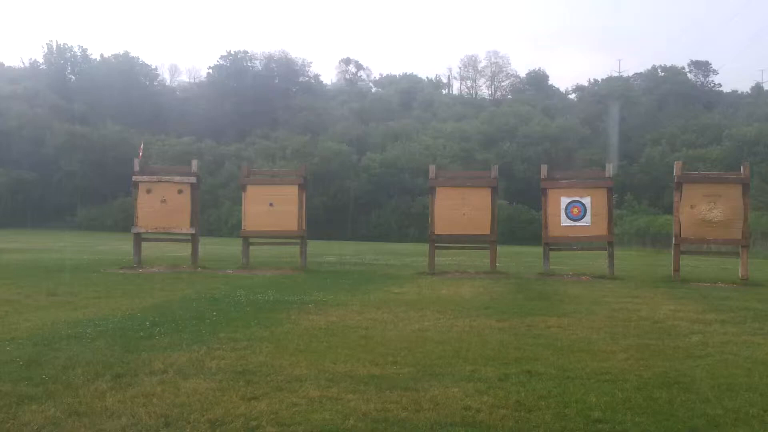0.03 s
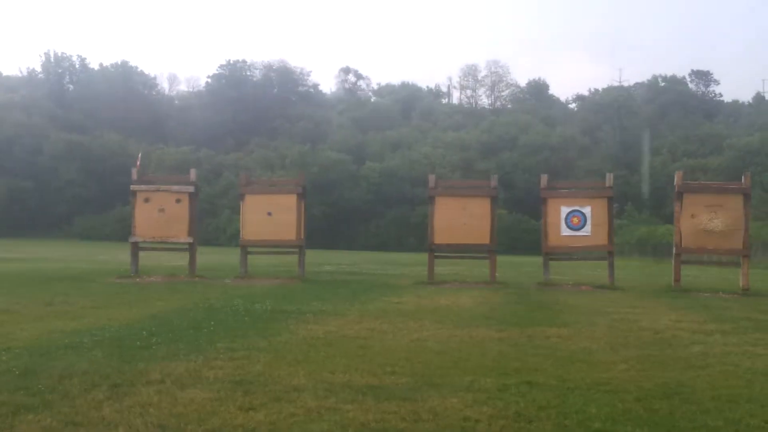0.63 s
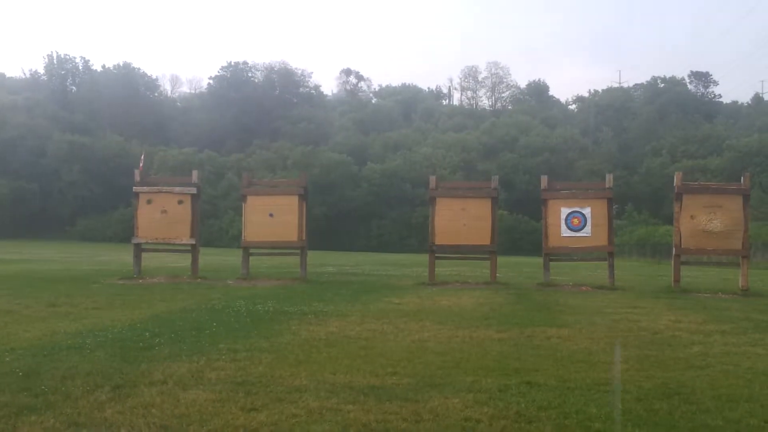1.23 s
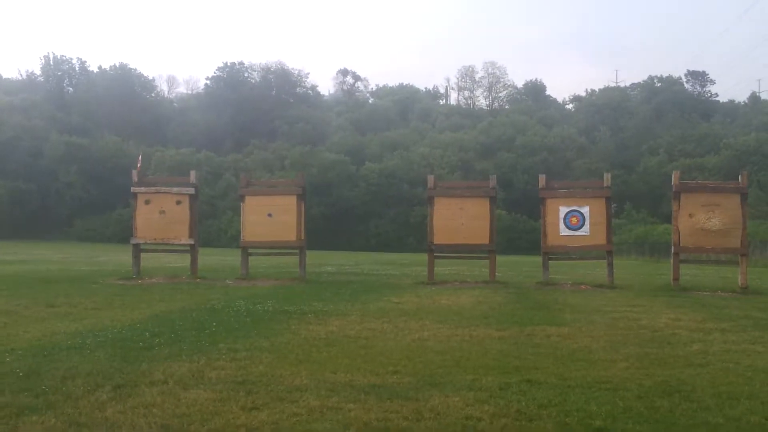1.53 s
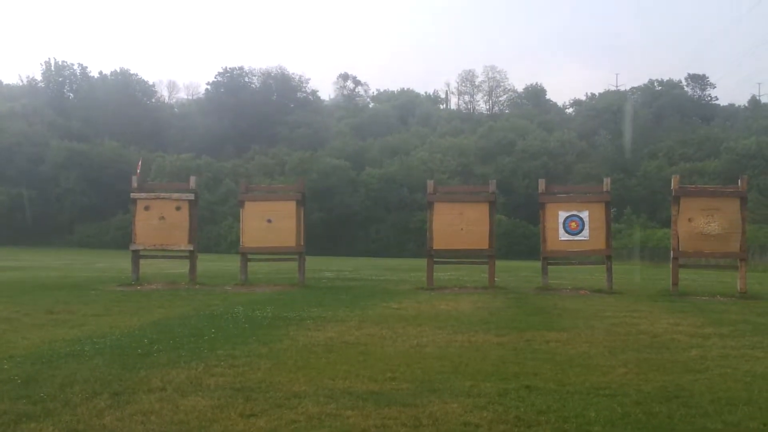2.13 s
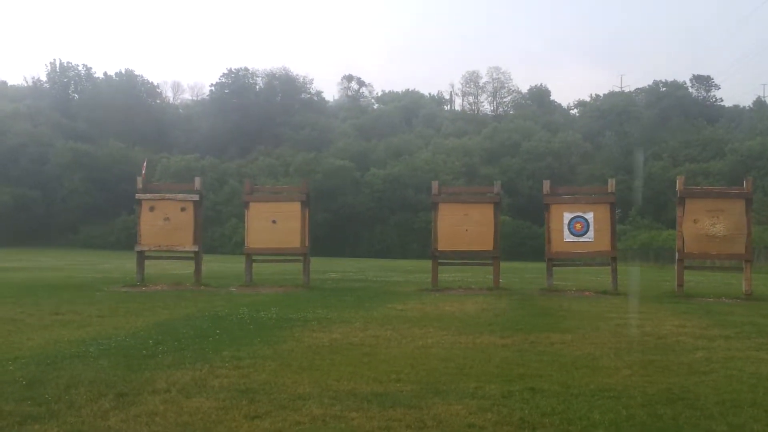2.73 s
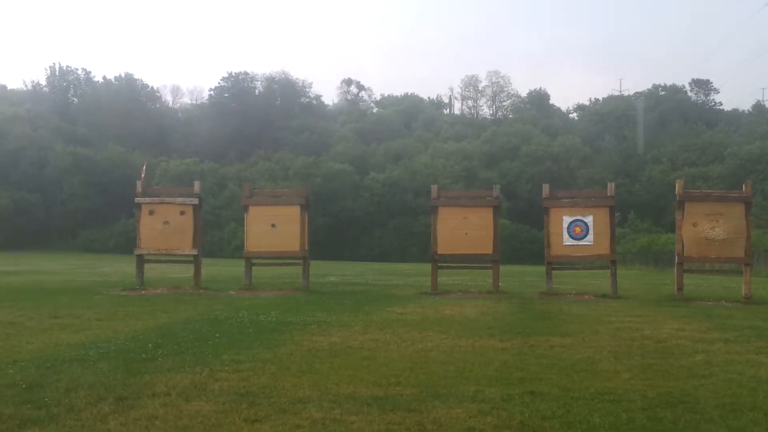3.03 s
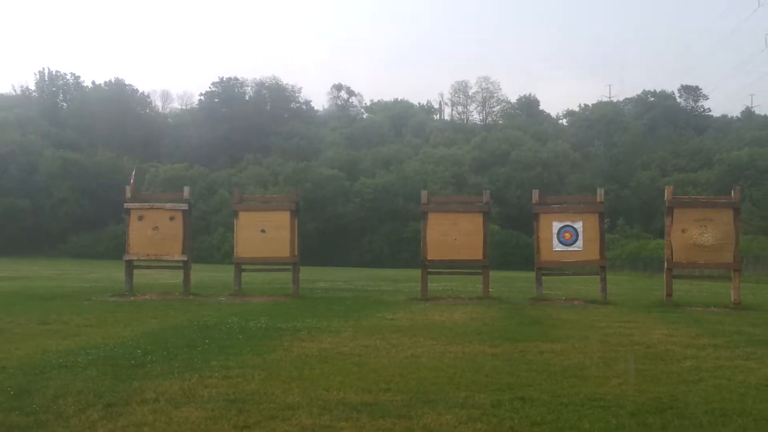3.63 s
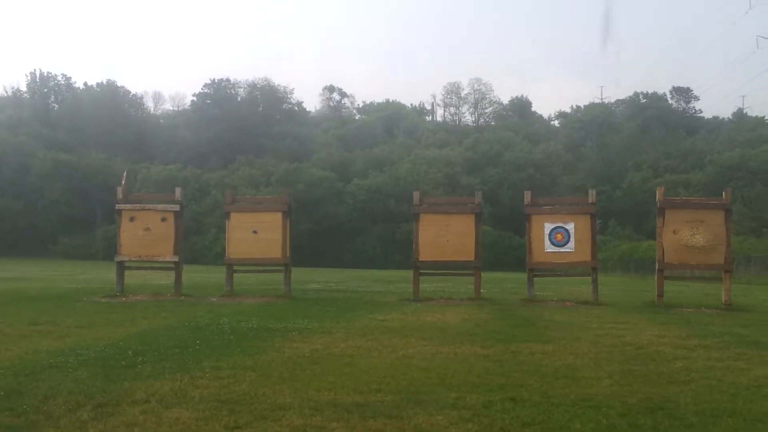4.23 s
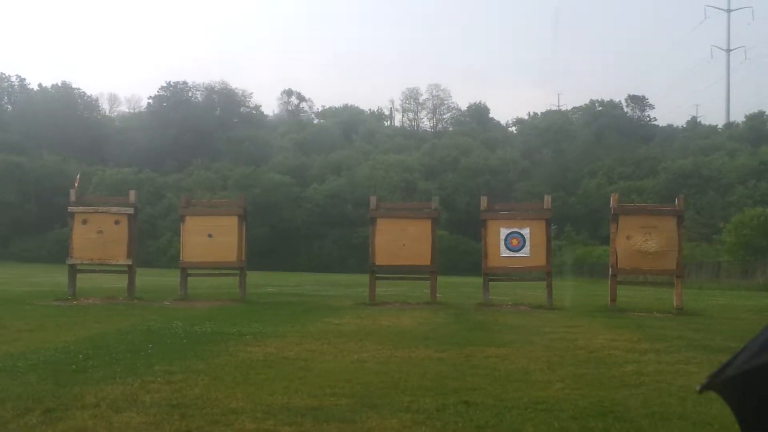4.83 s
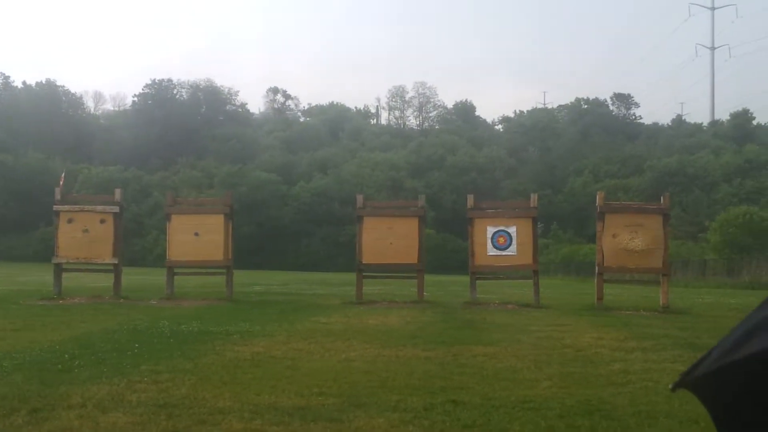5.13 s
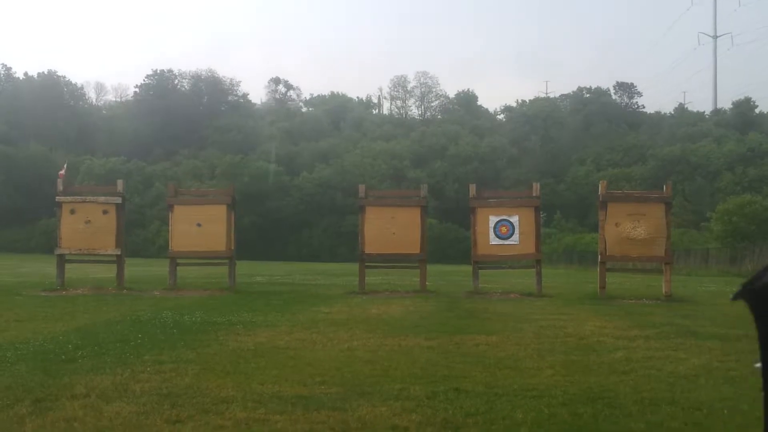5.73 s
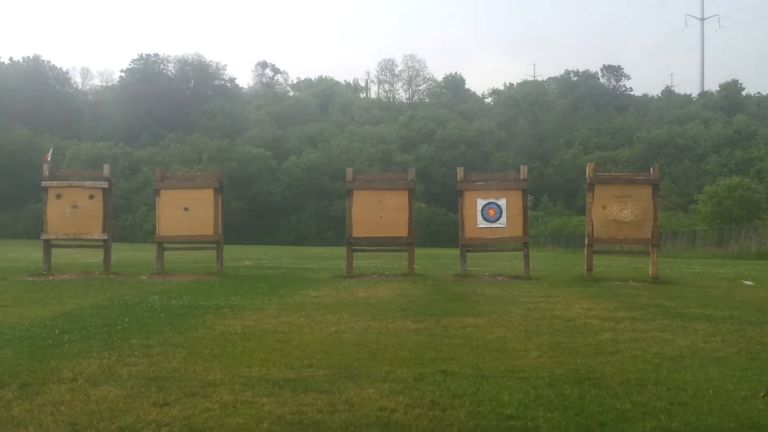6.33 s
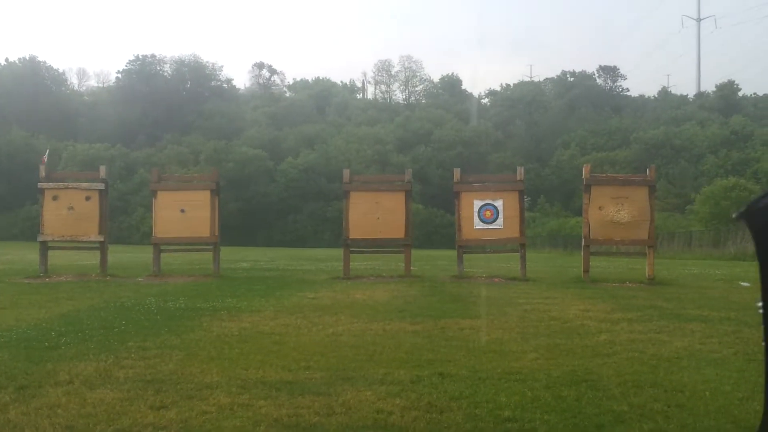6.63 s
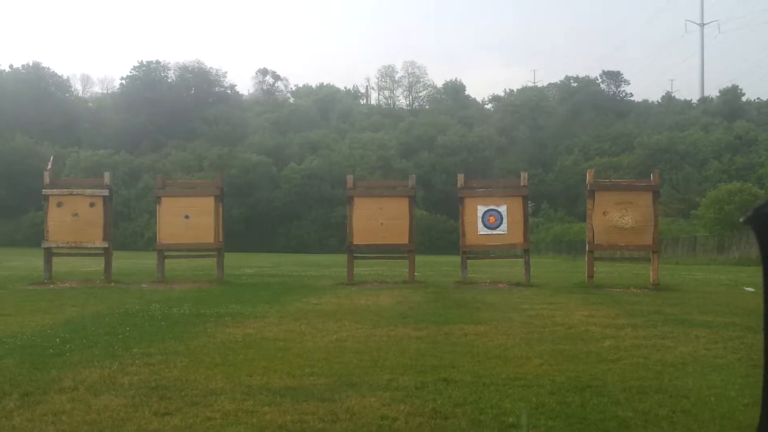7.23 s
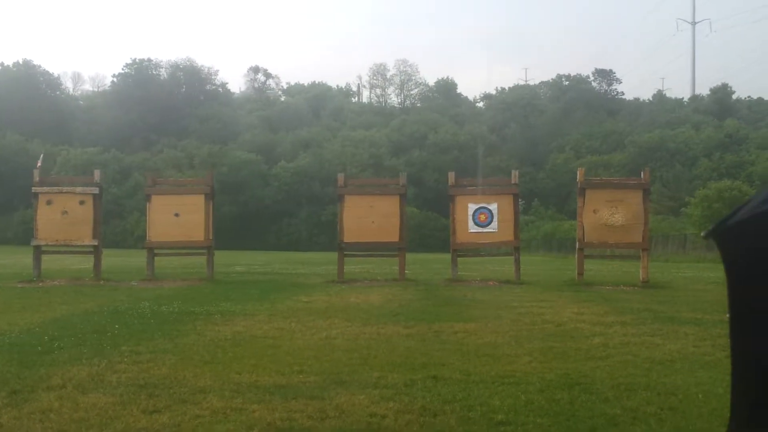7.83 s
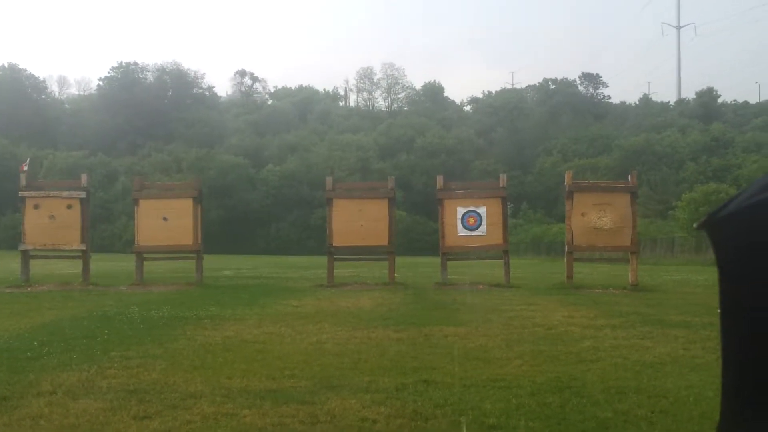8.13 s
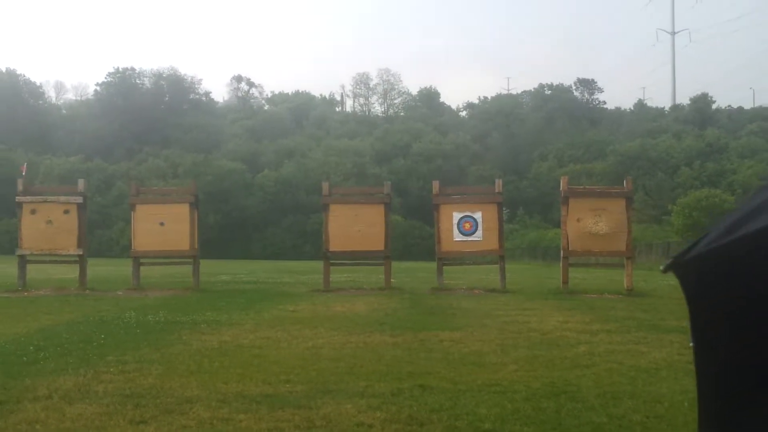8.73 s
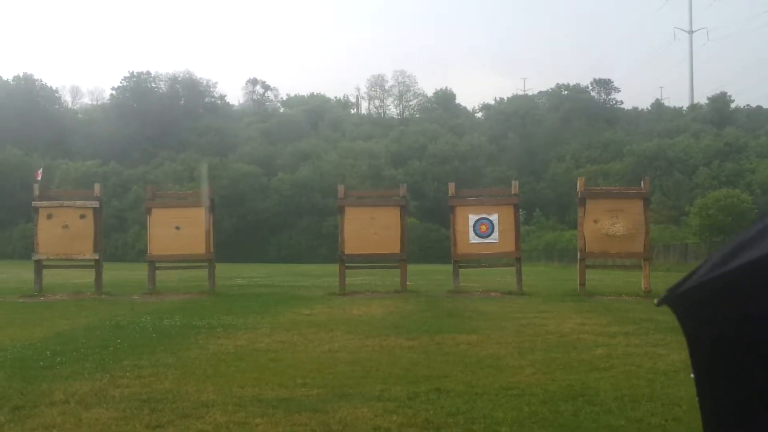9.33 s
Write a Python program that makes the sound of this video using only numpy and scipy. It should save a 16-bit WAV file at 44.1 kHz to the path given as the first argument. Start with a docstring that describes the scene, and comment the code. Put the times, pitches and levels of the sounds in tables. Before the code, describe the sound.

After a second of silence with one small click, heavy rain starts abruptly, drumming on an umbrella held just above the microphone at the edge of a grass field. Dense drops snap on the taut cloth, with occasional deeper thumps and bright pings. Rain hisses and spatters on the grass all around, over a faint rumble of air and the shifting umbrella. The patter continues to the end.

```python
"""At the edge of a grass field, heavy rain drums on an umbrella held just over a phone.
Each impact drives the taut cloth, a damped membrane that snaps back and rings briefly; heavy drops
thump whole panels and a few ping brightly. Rain hisses and spatters on the grass all round, the
umbrella rumbles as it shifts, and air stirs at the two microphone ports.
The first second is silent but for one small click."""
import sys
import numpy as np
from scipy import signal
from scipy.fft import rfft, irfft
from scipy.io import wavfile
from scipy.ndimage import uniform_filter1d

SR = 44100
rng = np.random.default_rng(int(sys.argv[2]) if len(sys.argv) > 2 else 0)


def int16_out(signal):
    """Quantize to a 16-bit WAV file."""
    q = np.round(np.clip(np.atleast_2d(signal).T, -1, 1) * 32767)
    wavfile.write(sys.argv[1], SR, q.astype(np.int16))


N = 413658
TIME, FREQS = np.arange(N) / SR, np.fft.rfftfreq(N, 1 / SR)
START_S = 1.004  # the rain is heard from here on

# Levels in the tables are relative, ahead of each source's gain and filtering.
# heaviest drops on the cloth: start_s, level_db, contact_ms, flutter_hz, flutter_ratio, left_lag_ms
HEAVY_DROPS = [(1.0269, -7, 0.16, 2000.0, 0.32, 0.058), (1.0942, -8, 0.18, 1500.0, 0.35, 0.28),
               (1.1113, -4, 1.2, 2600.0, 0.35, 0), (1.1155, 9, 1.3, 3820, 0.3, 0.082),
               (1.1506, 3.5, 0.39, 3800.0, 0.23, 0.12), (1.1924, 2.5, 0.94, 6000.0, 0.062, 0.18),
               (1.2512, -0.5, 0.25, 5230, 0.42, 0.067), (1.3091, 2, 0.45, 6800.0, 0.1, 0.076),
               (1.3213, 0.5, 0.13, 6800.0, 0.1, 0.13), (1.3418, 0.5, 0.29, 2000.0, 0.35, 0.12),
               (1.3628, -1, 0.23, 1500.0, 0.31, 0.12), (1.3716, 1, 0.77, 3800.0, 0.18, 0.14),
               (1.4832, 0, 0.44, 4480, 0.25, 0.24), (1.5658, 2, 0.28, 5200.0, 0.092, 0.036),
               (1.6094, 0, 0.79, 4500.0, 0.15, 0.13), (1.66, 1.5, 0.35, 4500.0, 0.091, 0.09),
               (1.677, -2, 0.4, 6000, 0.16, 0.17), (1.7245, -4, 0.44, 2600.0, 0.2, 0.14),
               (1.7582, -2, 0.11, 4500.0, 0.2, 0.18), (1.7776, 3, 1.1, 4500.0, 0.089, 0.17),
               (1.7826, -4, 0.38, 4500.0, 0.2, 0.1), (1.8256, 0, 0.3, 5200.0, 0.2, 0.096),
               (1.8388, -0.5, 0.18, 2000.0, 0.66, 0.34), (1.8458, 2, 0.19, 6800.0, 0.082, 0.14),
               (2.0037, 1, 0.64, 3800.0, 0.14, 0.15), (2.0658, -1, 0.44, 3200.0, 0.2, 0.13),
               (2.0763, -0.5, 0.23, 6800.0, 0.31, 0.0046), (2.081, 0.5, 1.3, 2000.0, 0.62, 0.15),
               (2.1184, -11, 0.35, 5200.0, 0.2, 0.22), (2.1376, -2, 0.36, 5200.0, 0.2, 0.22),
               (2.1653, -9, 0.6, 3800.0, 0.17, 0.12), (2.1916, 0, 0.25, 4500.0, 0.2, 0.13),
               (2.2005, -2.5, 0.36, 6000.0, 0.22, 0.24), (2.2147, 0.5, 0.38, 6000.0, 0.11, 0.0072),
               (2.2251, 0, 0.7, 2000.0, 0.2, 0.031), (2.2377, 4, 0.19, 5170, 0.084, 0.3),
               (2.4301, -4, 0.5, 3800.0, 0.25, 0.26), (2.5489, -5, 0.37, 3800, 0.15, 0.16),
               (2.6277, 0, 0.18, 6000.0, 0.1, 0.083), (2.6499, 0, 0.85, 6800.0, 0.1, 0.2),
               (2.6573, -3, 0.7, 3200.0, 0.22, 0.2), (2.7059, -1, 0.43, 6800.0, 0.2, 0.16),
               (2.8254, -1.5, 0.43, 5200.0, 0.3, 0.11), (2.8488, 2, 0.98, 1500.0, 0.1, 0.11),
               (2.9138, -3, 0.39, 6000.0, 0.18, 0.14), (2.9375, 1, 0.14, 4500.0, 0.2, 0.089),
               (2.9623, 2, 0.5, 3800.0, 0.18, 0.18), (2.9822, 3.5, 0.27, 5400, 0.44, 0.24),
               (3.0449, -4, 0.29, 2000, 0.2, 0.15), (3.1126, 8.5, 1.6, 3200.0, 0.12, 0.089),
               (3.151, 6, 0.48, 6000, 0.13, 0.14), (3.1715, -4, 0.84, 3200.0, 0.2, 0.32),
               (3.2514, -1, 1.3, 2600.0, 0.18, 0.2), (3.3022, 5.5, 0.28, 6760, 0.12, 0.24),
               (3.3356, 0, 0.38, 1500.0, 0.2, 0.37), (3.3785, -0.5, 0.13, 3840, 0.36, 0.038),
               (3.6032, 4, 1.2, 2600.0, 0.19, 0.18), (3.6149, -1.5, 0.38, 3800.0, 0.2, 0.055),
               (3.6392, 6, 0.89, 3200.0, 0.12, 0.094), (3.6642, -4, 0.65, 2000, 0.15, 0.15),
               (3.7018, -0.5, 0.48, 6800.0, 0.086, 0.046), (3.7768, 1.5, 1.3, 2000.0, 0.18, 0.22),
               (3.8907, -17, 0.2, 2600, 0.15, 0.12), (3.96, 3.5, 0.56, 5230, 0.15, 0.099),
               (3.9983, -0.5, 0.34, 3200.0, 0.2, 0.15), (4.0638, -1.5, 0.32, 2000, 0.25, 0.16),
               (4.1027, 1, 0.16, 3200.0, 0.32, 0.097), (4.1665, 0, 0.77, 6000.0, 0.076, 0.051),
               (4.1863, -1.5, 0.32, 4500.0, 0.29, 0.16), (4.2153, 2.5, 0.46, 2600.0, 0.092, 0.086),
               (4.2227, 2.5, 0.23, 2000.0, 0.2, 0.1), (4.2891, -6, 0.34, 3200.0, 0.22, 0.13),
               (4.2952, -3, 0.24, 3800, 0.18, 0.052), (4.3603, 2.5, 0.26, 2000.0, 0.2, 0.16),
               (4.3717, 2.5, 0.068, 5200.0, 0.1, 0.11), (4.4835, 4, 1.3, 3800.0, 0.092, 0.099),
               (4.6738, 5.5, 0.5, 6000.0, 0.14, 0.16), (4.6053, 0.5, 0.17, 2000, 0.2, 0.18),
               (4.8193, -3.5, 0.19, 3800.0, 0.2, 0.047), (4.8684, 0, 0.4, 1800, 0.18, 0.15),
               (5.0288, 0, 0.36, 5240, 0.11, 0.18), (5.2263, -4, 1.3, 2600.0, 0.64, 0.21),
               (5.2899, 1.5, 0.82, 4500.0, 0.2, 0.24), (5.3109, -8, 0.5, 2000, 0.15, 0.15),
               (5.5802, 4.5, 1.1, 3800.0, 0.1, 0.13), (5.5876, 0, 0.36, 4500.0, 0.1, 0.15),
               (5.633, 0.5, 0.54, 2600.0, 0.22, 0.19), (5.8352, 5.5, 0.38, 4940, 0.2, 0.17),
               (5.933, -2, 0.39, 6000, 0.12, 0.21), (6.027, -5.5, 0.33, 4500.0, 0.14, 0.095),
               (6.0991, -2.5, 0.32, 3800.0, 0.1, 0.099), (6.2135, -6, 0.14, 2600.0, 0.2, 0.12),
               (6.2479, -3, 0.12, 5200.0, 0.2, 0.055), (6.3673, -0.5, 0.95, 4500.0, 0.23, 0.15),
               (6.5584, -7, 0.19, 7600.0, 0.2, 0.16), (6.6002, -3, 0.46, 3220, 0.2, 0.026),
               (6.6224, -5, 0.16, 4500, 0.15, 0.22), (6.7758, 1.5, 1.5, 2600.0, 0.35, 0.14),
               (7.0473, -4, 0.26, 3200.0, 0.27, 0.18), (7.1538, -1, 0.32, 2000.0, 0.25, 0.16),
               (7.2033, -3, 0.39, 2600.0, 0.4, 0.18), (7.3155, -4, 0.45, 2600, 0.15, 0.18),
               (7.3721, 2.5, 0.79, 2600.0, 0.1, 0.19), (7.518, 0.5, 0.78, 4500.0, 0.1, 0.2),
               (7.521, -2, 0.88, 5200.0, 0.2, 0.2), (7.6437, 5.5, 0.27, 5200.0, 0.1, 0.077),
               (7.7666, -2.5, 0.19, 2000.0, 0.47, 0.19), (7.7799, -2, 0.4, 6000.0, 0.2, 0.22),
               (7.8077, 5, 0.32, 3200.0, 0.1, 0.12), (7.8413, -1.5, 0.17, 4500.0, 0.4, 0.058),
               (7.9194, 3, 0.35, 5300, 0.25, 0.19), (8.0596, -3.5, 0.25, 3800.0, 0.36, 0.067),
               (8.2081, -2, 0.34, 3200.0, 0.1, 0.055), (8.2228, -4, 0.38, 2600, 0.2, 0.15),
               (8.2577, -5, 0.55, 3200, 0.2, 0.17), (8.2639, 1.5, 0.36, 5200.0, 0.1, 0.079),
               (8.3406, -3, 0.18, 3200, 0.2, 0.13), (8.4956, -2.5, 0.18, 2300, 0.35, 0.21),
               (8.5361, -4, 0.13, 1800, 0.5, 0.13), (8.615, 0, 0.12, 6470, 0.31, 0.14),
               (8.6277, 4, 0.95, 2020, 0.46, 0.067), (8.6443, -6, 0.35, 3200, 0.22, 0.15),
               (8.6925, -1, 0.37, 2600.0, 0.1, 0.14), (8.7287, -7, 0.1, 2000, 0.45, 0.12),
               (8.7756, -2.5, 0.38, 4500, 0.13, 0.081), (8.8328, -3, 0.67, 2000.0, 0.2, 0.16),
               (8.8528, 2.5, 0.18, 1500.0, 0.35, 0.22), (8.9097, 1, 0.4, 3200.0, 0.1, 0.13),
               (8.9979, 1.5, 1.1, 2600.0, 0.32, 0.2), (9.1454, 2, 0.52, 5200.0, 0.12, 0.15),
               (9.1792, 6.5, 0.32, 1500.0, 0.12, 0.22), (9.2118, -5, 0.59, 3800.0, 0.64, 0.074),
               (9.2337, -1.5, 0.49, 3220, 0.2, 0.15), (9.3015, 3.5, 0.23, 6900, 0.12, 0.087)]
# pings of drops on hard or wet spots: start_s, level_db, pitch_hz
PINGS = [(1.2264, -20, 3500), (1.7024, -22, 6500), (1.7578, -16, 11500), (1.7611, -15, 6800),
         (2.0864, -16, 6900), (2.1377, -21, 5800), (2.2115, -14, 4020), (2.2797, -23, 6600),
         (2.6878, -6, 6460), (2.691, -4.5, 7440), (2.7184, -18, 6000), (2.892, -20, 4000),
         (2.936, -19, 11500), (3.2025, -17.5, 4000), (3.299, -16, 6270), (3.377, -19, 12000),
         (3.3918, -6, 8050), (3.395, -8, 7550), (3.5193, -21, 8800), (3.5592, -14.5, 6540),
         (3.6697, -15, 5600), (3.7245, -17, 6000), (3.9339, -21, 6000), (4.0194, -16, 12000),
         (4.1212, -16, 11000), (4.2, -18, 6000), (4.6735, -11, 6500), (5.0857, -14, 3700),
         (5.0962, -20, 11500), (5.1708, -18, 3800), (5.3083, -19, 10900), (5.8018, -24, 8400),
         (5.835, -8, 6200), (5.8713, -21, 5900), (6.1195, -17, 10000), (6.5582, -12, 7490),
         (6.755, -16, 5700), (7.1686, -21, 5900), (7.4743, -16, 12000), (7.906, -18, 6500),
         (8.2072, -20, 9550), (8.5455, -18, 6550), (8.615, -10, 6830), (8.6445, -17, 3270),
         (8.8466, -16, 6760), (8.85, -15, 6500), (8.865, -16, 3700), (8.9689, -20, 6000),
         (8.973, -12.5, 6000), (9.0644, -14, 11600), (9.0667, -15, 8600), (9.182, -13.5, 6400)]
# thumps of a whole panel: start_s, level_db, pitch_hz
PANEL_THUMPS = [(1.116, -17, 670), (1.793, -11, 246), (2.0037, -13, 290), (2.587, -18, 46),
                (2.812, -12.5, 79.5), (3.113, -3, 826), (3.151, -6, 360), (3.6388, -16, 580),
                (3.959, -13, 650), (4.106, -11, 198), (4.308, -14, 156), (4.6738, -18, 680),
                (4.674, -16, 215), (4.897, -17, 99), (5.5805, -7, 298), (5.8352, -2.5, 276),
                (5.8365, -14, 620), (7.512, -22, 75)]
# puffs of air on the left port: centre_s, level_db
AIR_PUFFS = [(1.309, -13.5), (1.373, -10), (1.491, -11.5)]
# strength of the shower and softness of its patter: time_s, level_db, contact_ms
SHOWER_COURSE = [(1.25, -28.5, 0.6), (1.77, -26.5, 0.63), (2.15, -26, 0.58), (2.31, -29, 0.34),
                 (2.51, -31.5, 0.39), (3.03, -27, 0.56), (3.48, -28, 0.51), (4.09, -27.5, 0.44),
                 (4.93, -31, 0.49), (5.4, -28.5, 0.66), (6.28, -30.5, 0.62), (7.75, -27.5, 0.97),
                 (8.04, -29.5, 0.55), (9.35, -28.5, 0.71)]
# octave bands in which the cloth rings: centre_hz, t60_s, level_db
RING_BANDS = [(89, 0.1, -33), (178, 0.09, -11.5), (387, 0.028, -14), (670, 0.11, -6.5), (1363, 0.033, -4.5),
              (3000, 0.065, -3.5), (6000, 0.04, -5)]
# radiation response of the cloth: frequency_hz, gain_db
CLOTH_RESPONSE = [(60, -9.5), (250, 0.5), (330, 0.1), (460, -2.3), (560, 0.2), (700, 0.5), (950, -0.73),
                  (1400, 0.2), (2300, -0.9), (3500, -1), (5500, 0), (9000, 1.5), (15000, -2)]
# spectrum of rain on the grass: frequency_hz, density_db
GRASS_SPECTRUM = [(100, -3), (600, -16.5), (1300, -6.5), (2500, -14), (5000, -15), (8000, -16.5),
                  (15000, -20.5)]
# spectrum of the canopy's boom: frequency_hz, density_db
BOOM_SPECTRUM = [(20, -17), (45, 0), (80, 1), (130, -2.5), (220, -3.5), (330, -2.5), (600, -23),
                 (3000, -59)]
# spectrum of air moving at the ports: frequency_hz, density_db
AIR_SPECTRUM = [(15, -10), (35, 10), (65, 7), (110, 7.5), (250, -38), (1500, -25)]
# left and right microphone port cavities: resonance_hz, width_hz, rolloff_hz
PORT_CAVITIES = [(6740, 2850, 9900), (7920, 4030, 48000)]
# envelope of the rumble as the umbrella shifts: time_s, level_db
HANDLING_ENVELOPE = [(2.45, -58), (2.59, -27), (2.7, -50), (2.82, -32), (2.95, -58), (7.68, -66),
                     (7.77, -31), (7.82, -42), (7.86, -24), (7.91, -46), (7.965, -28), (8.01, -28.5),
                     (8.1, -56)]
# spectrum of that rumble: frequency_hz, density_db
HANDLING_SPECTRUM = [(50, -9), (110, -6.5), (200, 0.5), (270, 3.5), (400, -33), (1500, -68)]


def undb(db):
    """Amplitude ratio of a level in decibels."""
    return 10 ** (np.asarray(db) / 20)


def unit(x):
    """Normalisation to rms 1."""
    return x / np.sqrt(np.mean(x ** 2))


def decay(t, t60_s):
    """Exponential damping: 60 dB down after t60_s."""
    return np.exp(-np.log(1000) * t / t60_s)


def add(out, start_s, sound):
    """Superposition: a sound adds to the mix from start_s."""
    i = int(np.clip(start_s * SR, 0, N - 1))
    out[..., i:i + sound.shape[-1]] += sound[..., :N - i]


def colour(x, points, size=2048):
    """Minimum-phase filtering through (frequency_hz, gain_db) points."""
    hz, db = np.transpose(points)
    log_hz = np.log(np.fft.rfftfreq(size, 1 / SR) + 1)
    log_gain = np.log(undb(np.interp(log_hz, np.log(hz), db)))
    cepstrum = irfft(log_gain)[:size // 2]
    cepstrum[1:] *= 2
    impulse_response = irfft(np.exp(rfft(cepstrum, size)))
    return signal.oaconvolve(np.atleast_2d(x), impulse_response[None], axes=1)[:, :N]


def noise(spectrum, shape=N):
    """Spectral shaping of white noise, at rms 1."""
    return unit(colour(rng.standard_normal(shape), spectrum))


def resonance(hz, width_hz):
    """Frequency response of a damped mass on a spring."""
    return 1 / (1 - (FREQS / hz) ** 2 + 1j * FREQS * width_hz / hz ** 2)


def drift(rate_hz):
    """Slow random fluctuation of rms 1."""
    hold = int(SR / rate_hz)
    steps = np.repeat(rng.standard_normal(N // hold + 1), hold)
    return unit(uniform_filter1d(steps, hold)[:N])


def plip(hz, t60_s, spray, rise_s=.0001, tail_db=-21, tail_t60_s=0.079, size=600):
    """A wet impact: a damped sinusoid with a noise burst of fine spray that trails off."""
    t = np.arange(size) / SR
    hiss = np.diff(rng.standard_normal((2, size + 1))) / np.sqrt(2)
    burst = (np.sin(2 * np.pi * hz * t) + spray * hiss) * decay(t, t60_s)
    tail = undb(tail_db) * hiss * decay(t, tail_t60_s)
    return (burst + tail) * (1 - np.exp(-t / rise_s))


def grass_hiss(shower_db, gain_db=-6):
    """Incoherent summation: far impacts on all sides merge into a diffuse hiss."""
    return noise(GRASS_SPECTRUM, (2, N)) * undb(shower_db + gain_db + 1.2 * drift(rate_hz=23))


def canopy_boom(level_db=-35):
    """Random forcing: the whole canopy booms softly under the shower."""
    boom = noise(BOOM_SPECTRUM) * undb(level_db + 2.0 * drift(rate_hz=18))
    return boom * np.array([[1.1], [.85]])


def port_air(level_db=-39, puff_hz=95, puff_s=0.0051, size=1800):
    """Pressure fluctuations of moving air rumble mostly at the left port and at times puff into it."""
    out = noise(AIR_SPECTRUM) * undb(level_db + 2.0 * drift(rate_hz=5.7)) * np.array([[1], [.35]])
    t = (np.arange(size) - size / 2) / SR
    puff = -np.cos(2 * np.pi * puff_hz * t) * np.exp(-(t / puff_s) ** 2)
    for centre_s, db in AIR_PUFFS:
        add(out[0], centre_s + t[0], undb(db) * puff)
    return out


def click(start_s=0.3845, level_db=-23.0, size=66):
    """A discontinuity: a short ramp breaks off and is heard as a small dull click."""
    out = np.zeros((2, N))
    add(out, start_s, undb(level_db) * np.linspace(0, 1, size) * np.array([[1.3], [.7]]))
    return out


def grass_spatter(shower_db, spread_db=4, low_hz=2800, high_hz=10000, t60_s=0.0047, spray=0.58):
    """Discrete impacts in the wet grass nearby: some plip cleanly, others burst into crisp spray."""
    out = np.zeros((2, N))
    for when, pitch, side, rank, burst in rng.random((600, 5)):
        start_s = START_S + when * (TIME[-1] - START_S)
        hz = low_hz * (high_hz / low_hz) ** pitch
        db = shower_db[int(start_s * SR)] - spread_db * np.log(rank + 0.025)
        pan = np.sqrt([[side], [1 - side]])
        add(out, start_s, undb(db) * plip(hz, t60_s, spray * burst ** 2) * pan)
    return out


def handling_rumble():
    """Forced vibration: the cloth rumbles softly as the umbrella shifts in the hand."""
    return noise(HANDLING_SPECTRUM) * undb(np.interp(TIME, *np.transpose(HANDLING_ENVELOPE)))


def pings(t60_s=0.005, spray=0.67):
    """Impulse excitation: a drop on a hard or wet spot gives a bright, quickly damped ping."""
    out = np.zeros((2, N))
    for start_s, db, hz in PINGS:
        add(out, start_s, undb(db) * plip(hz, t60_s, spray))
    return out


def panel_thumps(gain_db=-1, t60_cycles=6.4, stretch=0.067, size=8000):
    """Tension modulation: a heavy drop swings a panel, whose pitch falls as the cloth relaxes."""
    out, t = np.zeros((2, N)), np.arange(size) / SR
    for start_s, db, hz in PANEL_THUMPS:
        fade = decay(t, t60_cycles / hz)
        phase = 2 * np.pi * np.cumsum(hz * (1 + stretch * fade)) / SR
        swing = np.sin(phase) + 0.12 * np.sin(2.24 * phase)
        add(out, start_s, -undb(db + gain_db) * swing * fade * np.array([[1], [.8]]))
    return out


def rainfall(shower_db, top_db, range_db, flutter_ratio, count, low_hz=1500, high_hz=7350):
    """A power law of drop strength: random rows like HEAVY_DROPS, the weak outnumbering the strong."""
    when, rank, wetness = rng.random((count, 3)).T
    softness, place = rng.standard_normal((count, 2)).T
    start_s = START_S + when * (TIME[-1] - START_S)
    below_top_db = 10 * np.log10(1 + rank * (undb(range_db) ** 2 - 1))
    db = np.interp(start_s, TIME, shower_db) + top_db - below_top_db
    time_s, _, median_contact_ms = np.transpose(SHOWER_COURSE)
    contact_ms = np.interp(start_s, time_s, median_contact_ms) * np.exp(0.75 * softness)
    flutter_hz = low_hz * (high_hz / low_hz) ** wetness
    left_lag_ms = .15 + 0.076 * place  # the path difference depends on where the drop lands
    return np.stack([start_s, db, contact_ms, flutter_hz, np.full(count, flutter_ratio), left_lag_ms], 1)


def impact_force(drops, rise_ratio=0.13, flutter_s=0.00046, size=240):
    """Momentum transfer: each drop's force rises suddenly, then falls as the water spreads."""
    start_s, db, contact_ms, flutter_hz, flutter_ratio, left_lag_ms = drops.T[:, :, None]
    contact_s = np.clip(contact_ms, .03, 1.2) / 1000
    channels = []
    for arrival_s in (start_s + left_lag_ms / 1000, start_s):
        index = (arrival_s * SR).astype(int) + np.arange(size)
        t = np.maximum(index / SR - arrival_s, 0)
        push = np.exp(-t / contact_s) - np.exp(-t / (contact_s * rise_ratio))
        # the wet spot under the drop flutters briefly, so each has its own colour
        flutter = flutter_ratio * np.sin(2 * np.pi * flutter_hz * t) * np.exp(-t / flutter_s)
        force = undb(db) * (push + flutter)
        channels.append(np.bincount(index.ravel(), force.ravel(), N)[:N])
    return np.array(channels)


def cloth_ring(decorrelated_hz=1300, return_s=0.00039, size=6000):
    """Reflection: waves run to and fro between a panel's ribs; short ones differ at the two ports."""
    t, out = np.arange(size) / SR, 0
    for hz, t60_s, db in RING_BANDS:
        band = signal.butter(2, [hz / np.sqrt(2), hz * np.sqrt(2)], "band", fs=SR, output="sos")
        mid, side = signal.sosfilt(band, rng.standard_normal((2, size)))
        envelope = (1 - np.exp(-t / return_s)) * decay(t, t60_s)
        waves = (mid + min(hz / decorrelated_hz, 1) * side * np.array([[1], [-1]])) * envelope
        bandwidth_gain = np.sqrt(np.sqrt(2) * hz / SR / size)
        out = out + undb(db) * unit(waves) * bandwidth_gain
    return out


def umbrella(drops, ring_db, snap_hz=560, snap_width_hz=760, panels=6):
    """A driven membrane radiates by its acceleration: the struck cloth snaps back, then rings on."""
    panel = rng.integers(0, panels, len(drops))
    forces = [impact_force(drops[panel == k]) for k in range(panels)]
    acceleration_response = (FREQS / snap_hz) ** 2 * resonance(snap_hz, snap_width_hz)
    snap = irfft(rfft(sum(forces)) * acceleration_response, N)
    ring = sum(signal.oaconvolve(force, cloth_ring(), axes=1)[:, :N] for force in forces)
    return snap + undb(ring_db) * ring


def scene():
    """Superposition of all sources; one shower level drives the random patter, spatter and hiss."""
    time_s, level_db, _ = np.transpose(SHOWER_COURSE)
    shower_db = np.interp(TIME, time_s, level_db)
    overhead = rainfall(shower_db, top_db=23.5, range_db=7.0, flutter_ratio=0.3, count=190)
    around = rainfall(shower_db, top_db=22.5, range_db=13.0, flutter_ratio=0.18, count=6000)
    # drops right above the phone are mostly snap; those further out arrive more as ringing cloth
    cloth = umbrella(np.vstack([HEAVY_DROPS, overhead]), ring_db=-2.5) + umbrella(around, ring_db=2.5)
    canopy = colour(cloth, CLOTH_RESPONSE) + panel_thumps() + handling_rumble() + pings()
    return canopy + grass_spatter(shower_db) + grass_hiss(shower_db) + canopy_boom() + port_air()


def record(dry, ceiling=.88, knee_order=6, cutoff_hz=14700):
    """Cavity resonance at the ports lifts the treble; soft saturation rounds off the hardest drops."""
    ports = np.array([resonance(hz, width_hz) * resonance(rolloff_hz, np.sqrt(2) * rolloff_hz)
                      for hz, width_hz, rolloff_hz in PORT_CAVITIES])
    heard = irfft(rfft(dry) * ports, N) * (TIME >= START_S) + click()  # only the click precedes the rain
    rounded = heard / (1 + np.abs(heard / ceiling) ** knee_order) ** (1 / knee_order)
    lowpass = signal.ellip(10, .2, 90, cutoff_hz, fs=SR, output="sos")
    return signal.sosfilt(lowpass, rounded)


dry = scene()
out = record(dry)
int16_out(out)
```